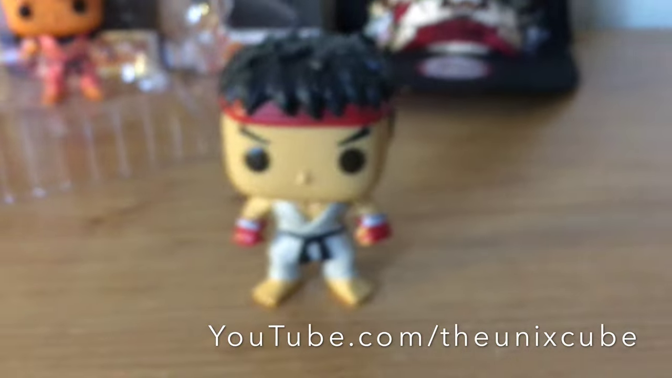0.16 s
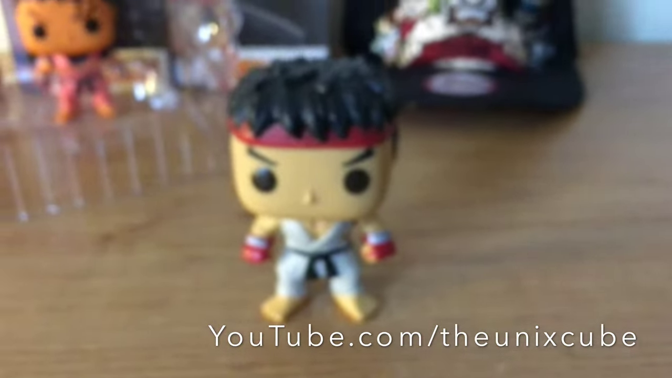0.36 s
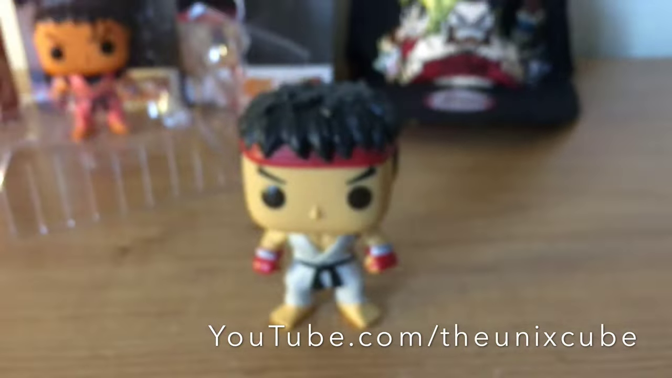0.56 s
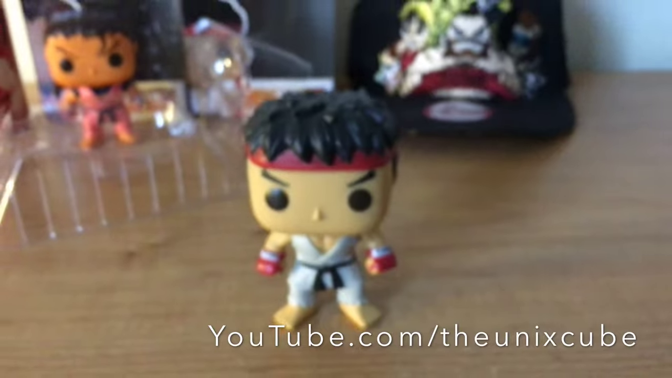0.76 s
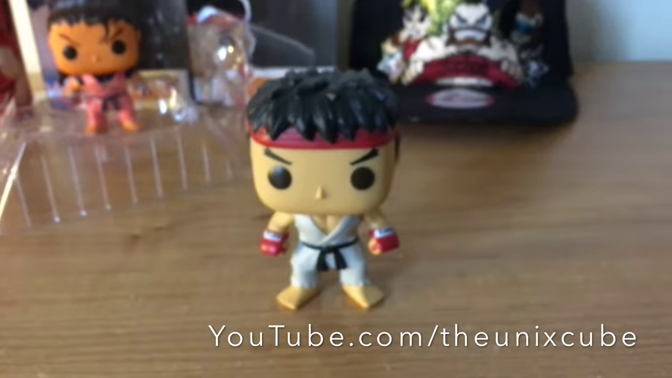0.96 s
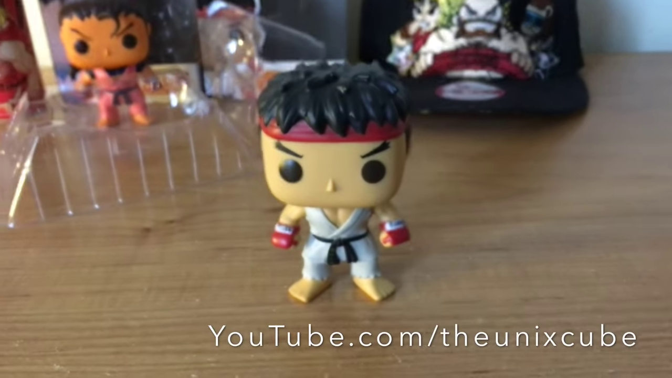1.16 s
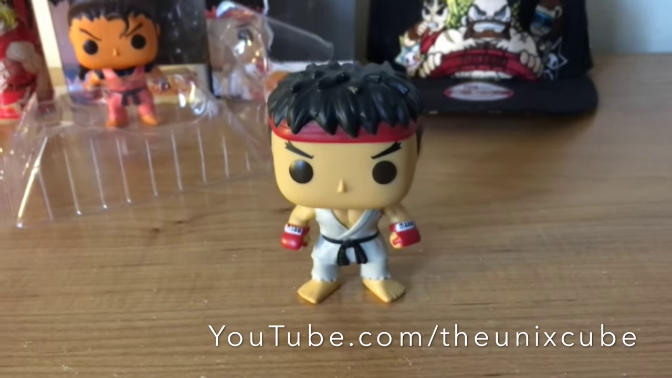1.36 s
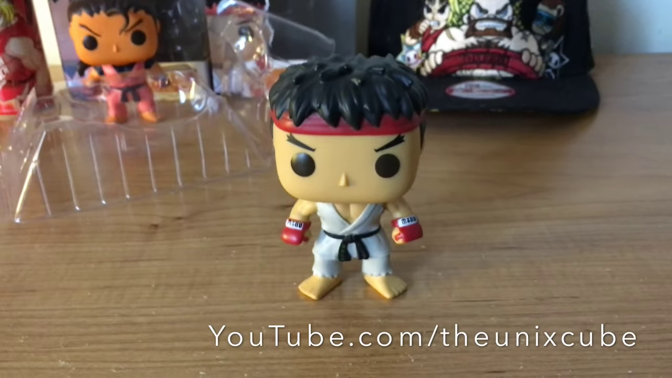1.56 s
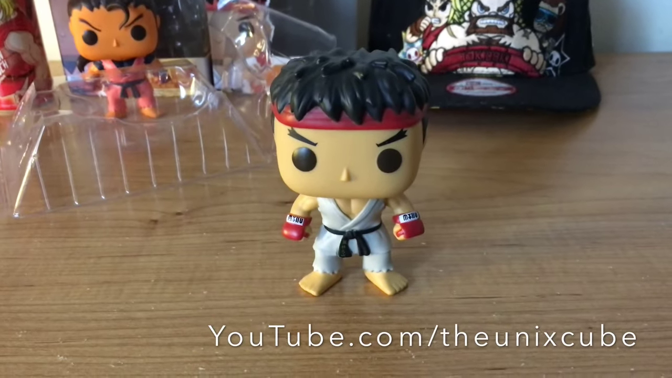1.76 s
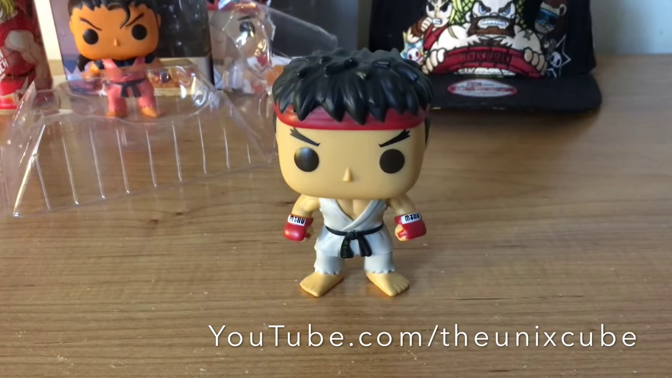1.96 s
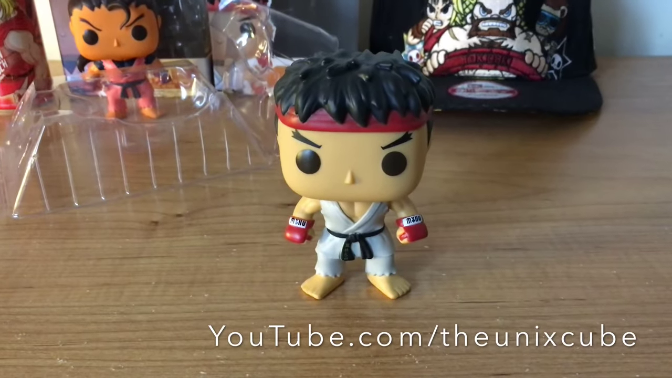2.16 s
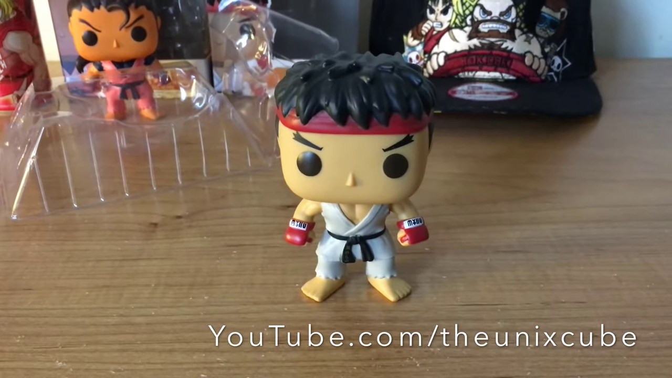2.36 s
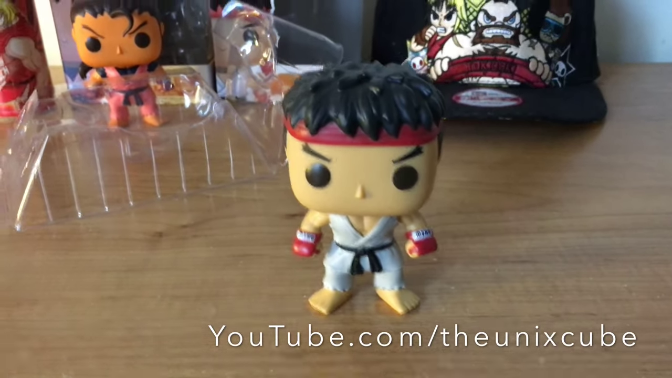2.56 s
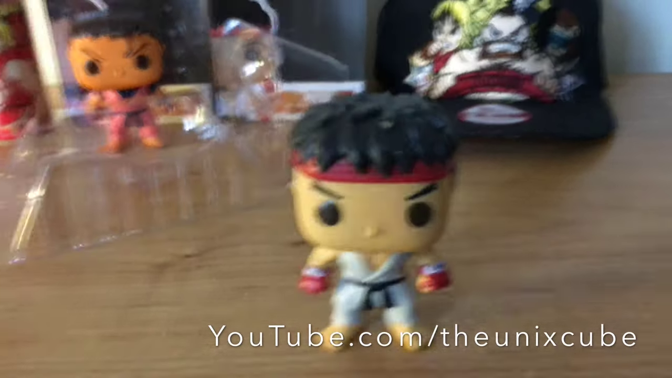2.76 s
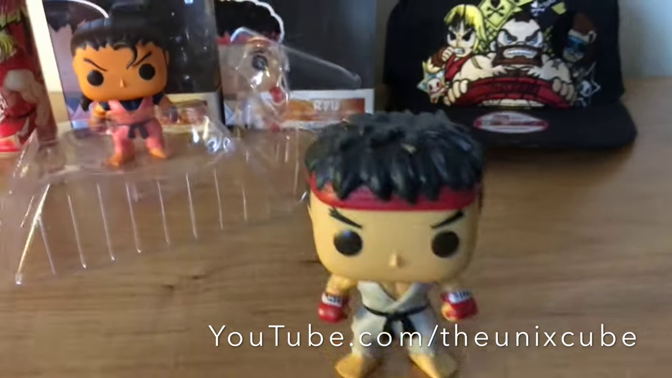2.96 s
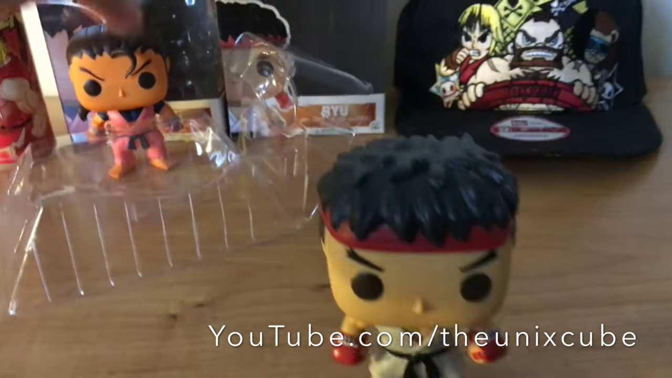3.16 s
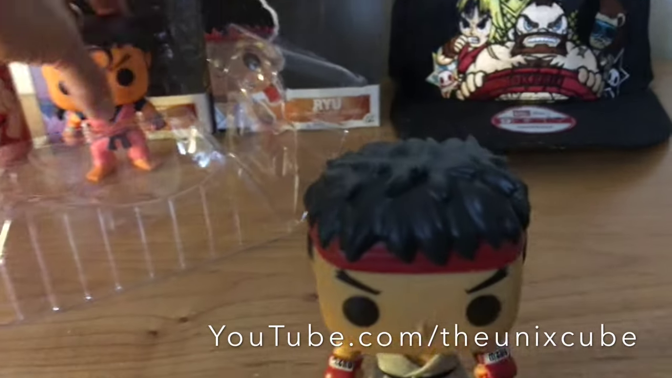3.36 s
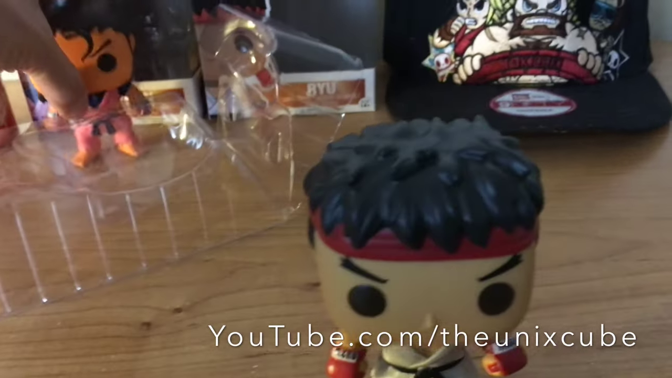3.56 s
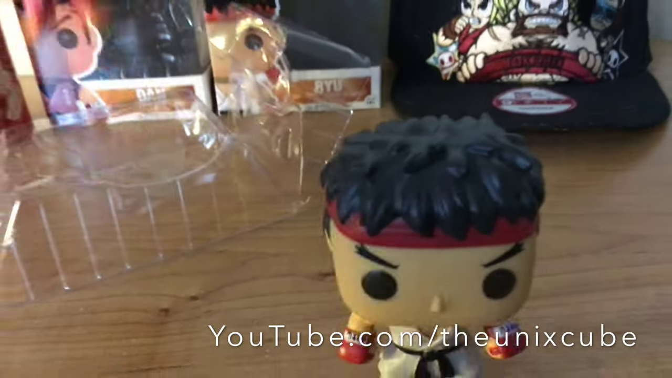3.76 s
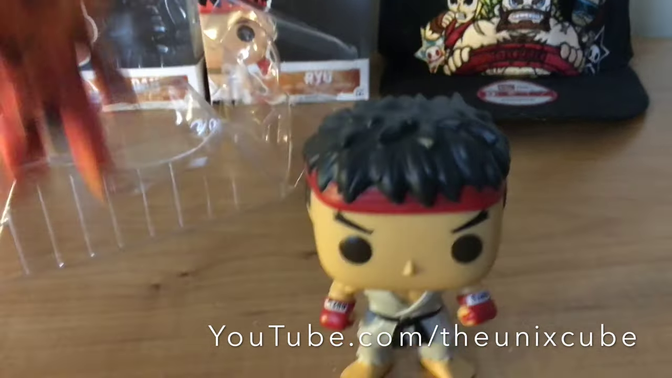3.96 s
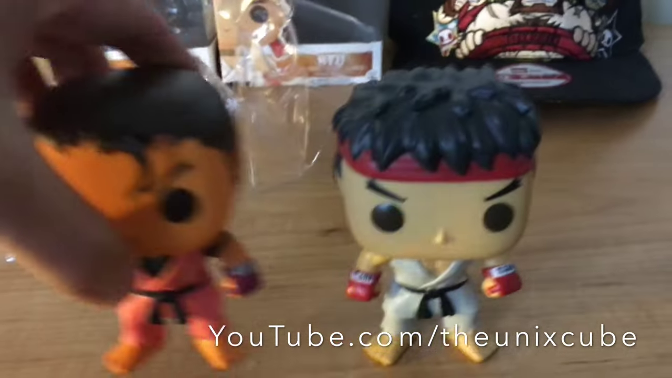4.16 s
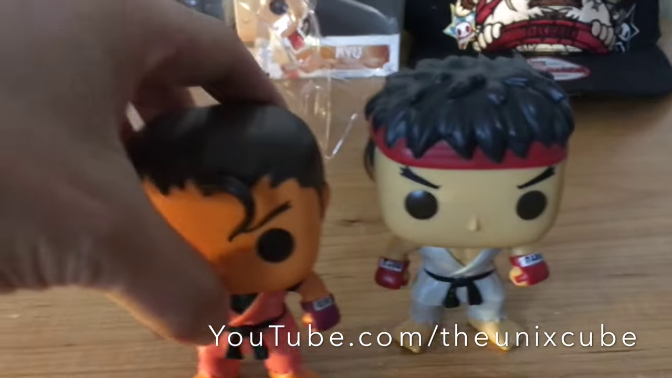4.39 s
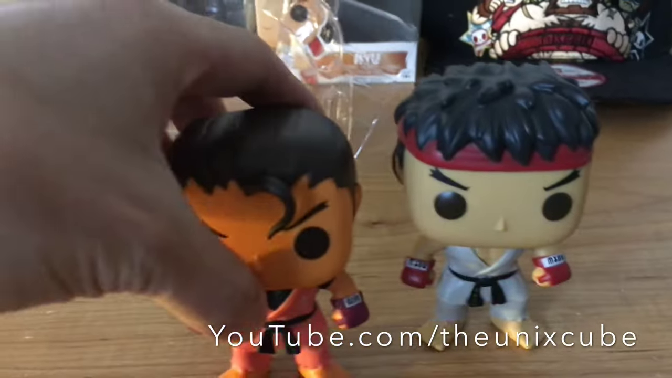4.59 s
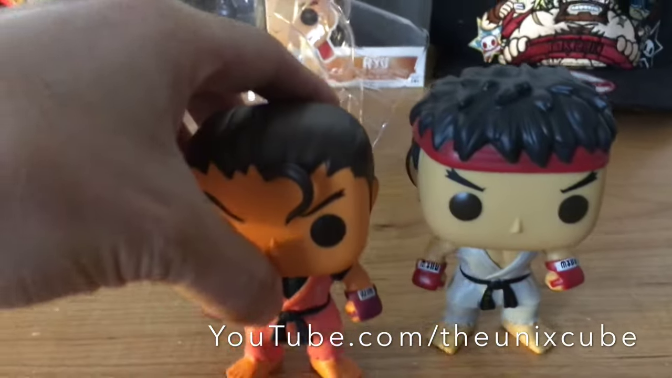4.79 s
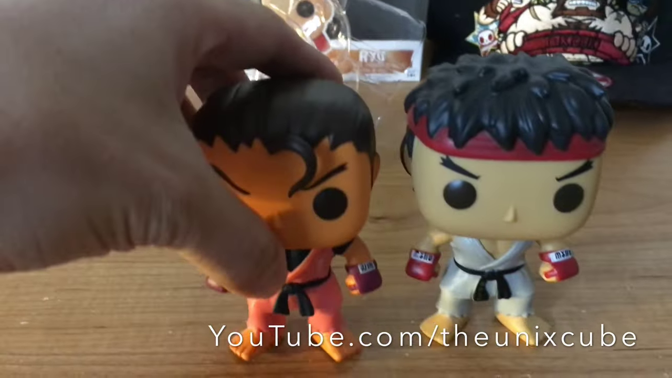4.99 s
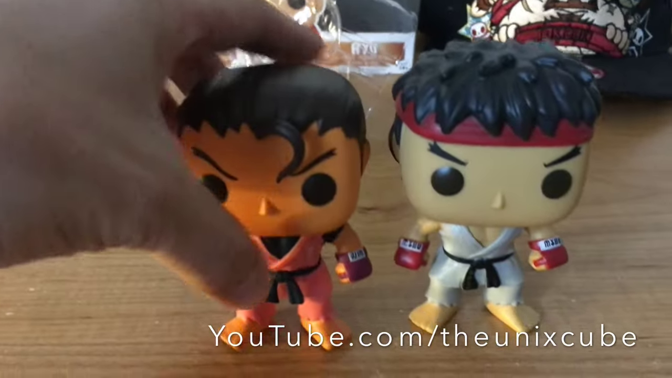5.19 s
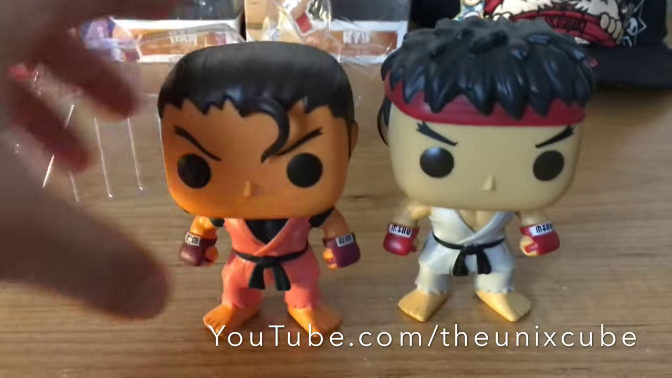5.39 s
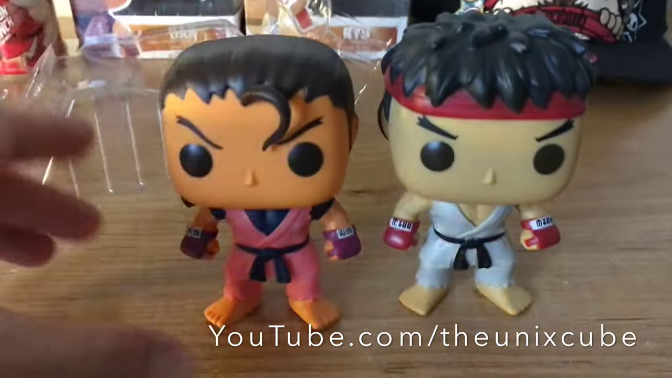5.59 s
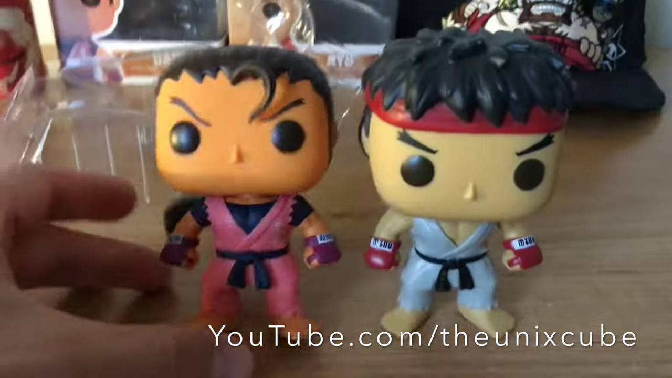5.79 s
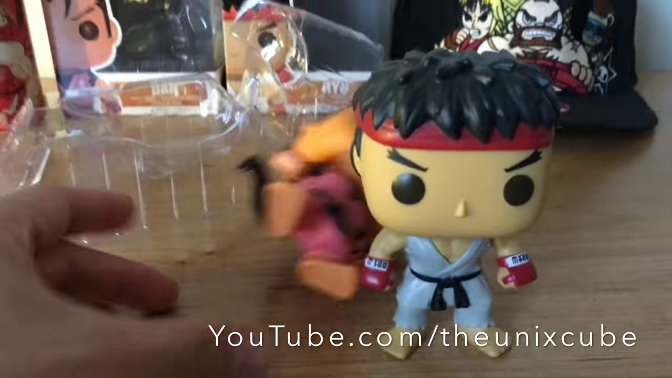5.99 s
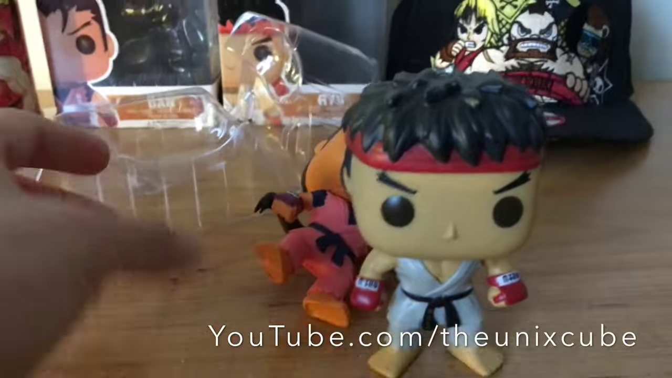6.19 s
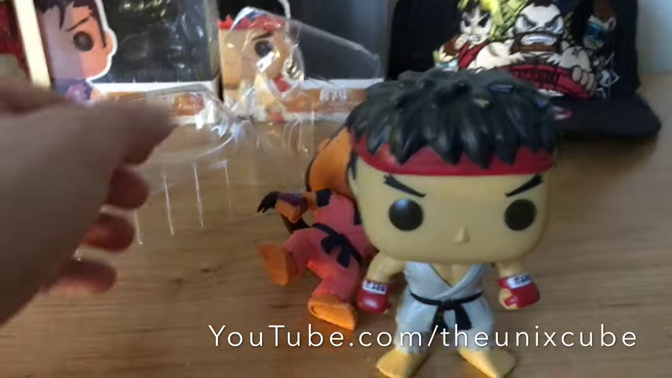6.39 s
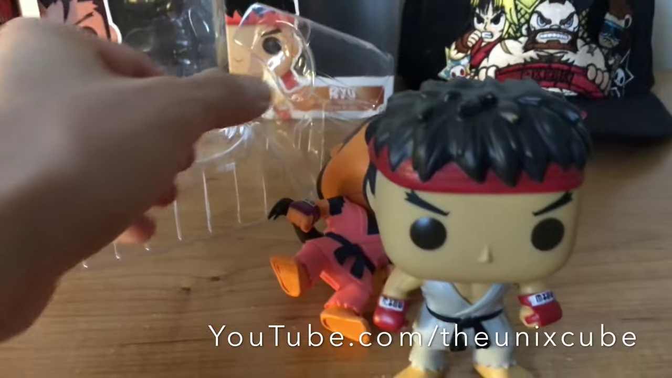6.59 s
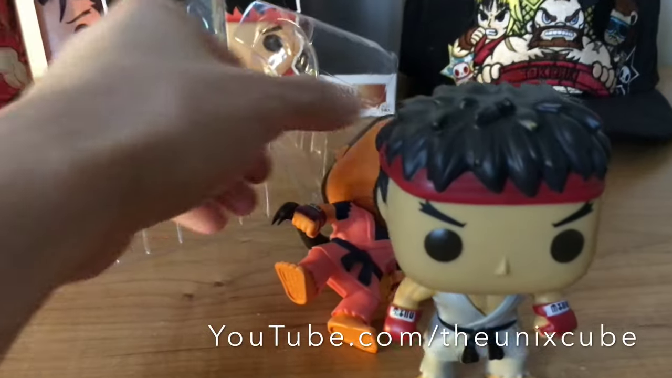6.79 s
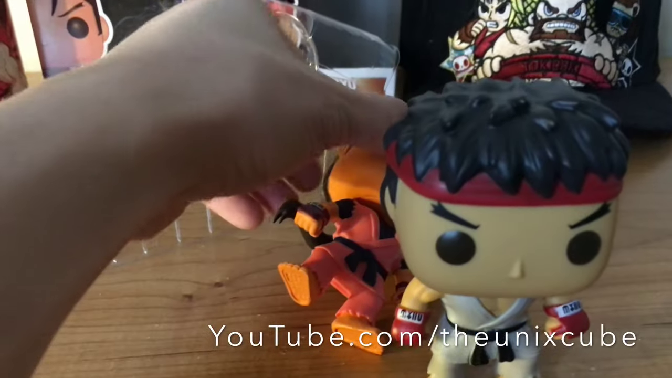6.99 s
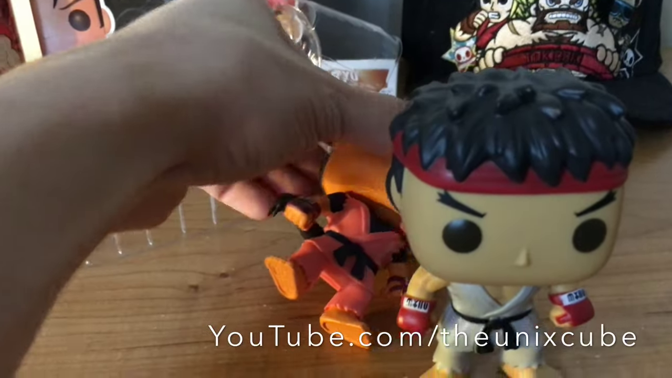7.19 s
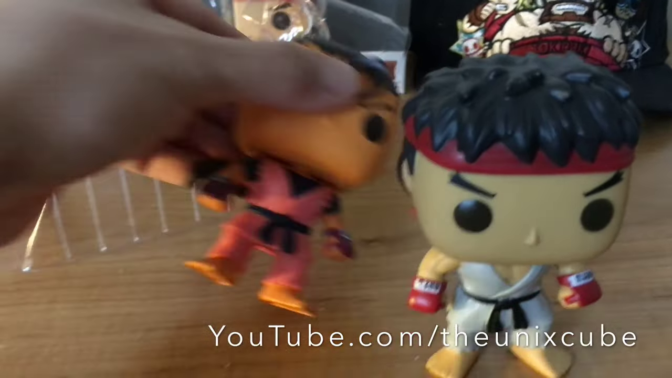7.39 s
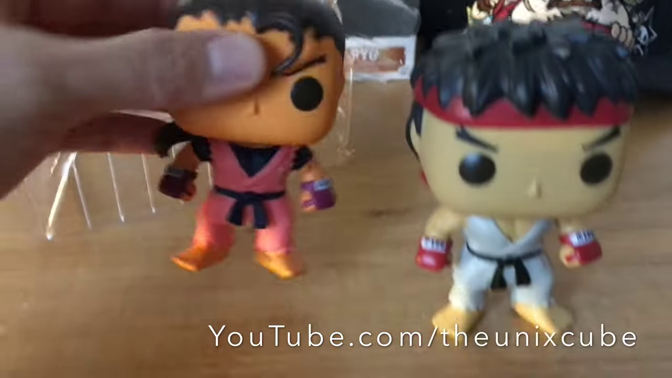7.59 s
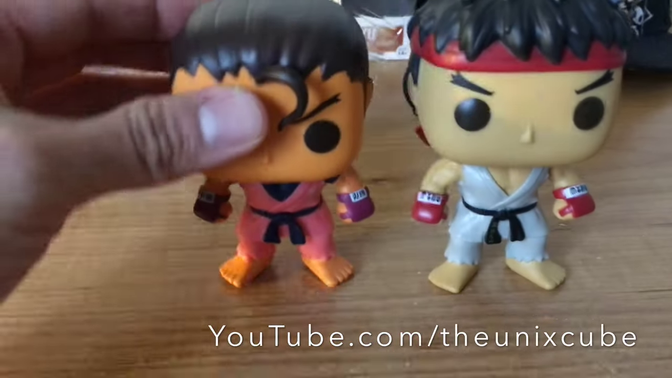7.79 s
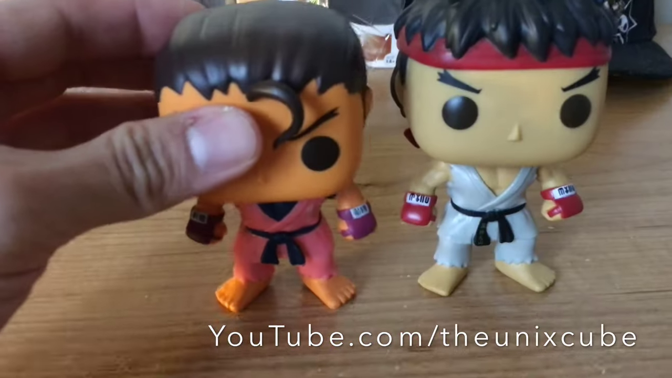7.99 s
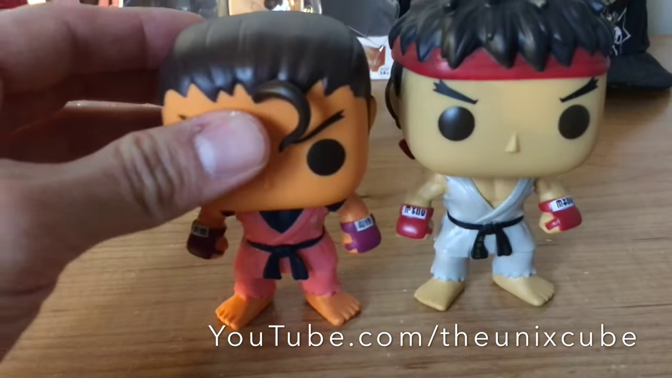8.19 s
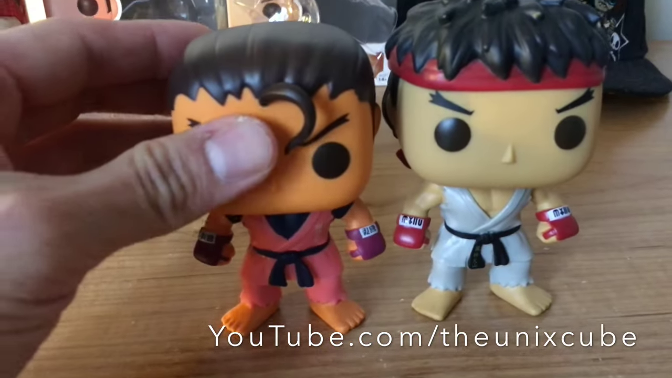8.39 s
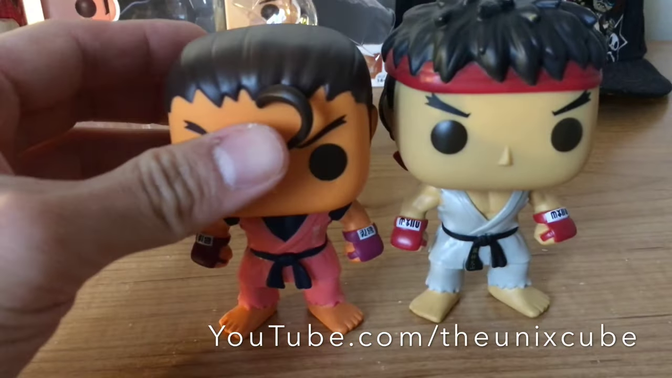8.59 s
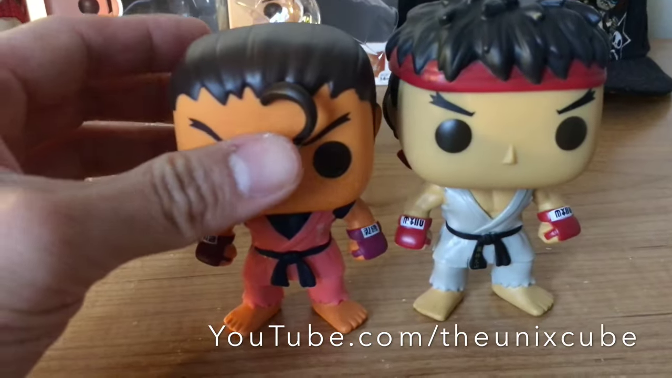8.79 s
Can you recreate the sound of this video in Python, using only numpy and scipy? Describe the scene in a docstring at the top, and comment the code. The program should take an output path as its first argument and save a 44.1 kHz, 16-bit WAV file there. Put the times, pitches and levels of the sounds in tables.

```python
"""Vinyl figure on a wooden desk

A hollow vinyl figure pops out of its thin plastic tray, is stood on a desk and scrapes into place.
It topples and clatters against a second figure, the wood booming under the crack of the shell,
then is picked up and stood again. Early on, the hand bumps the camera: close thumps, a creak
of the grip, finger scuffs. The room is small and quiet."""
import sys
import numpy as np
from scipy import signal
from scipy.fft import rfft, irfft, next_fast_len
from scipy.io import wavfile

SR = 44100
rng = np.random.default_rng(int(sys.argv[2]) if len(sys.argv) > 2 else 0)


def wrap_up_sound(samples):
    """Save the sound to the file named by the first command line argument, as 16-bit audio."""
    columns = np.atleast_2d(samples).T
    # keep every value between -1 and 1, then stretch to whole-number steps
    tamed = np.clip(columns, -1, 1)
    steps = np.round(tamed * 32767).astype(np.int16)
    wavfile.write(sys.argv[1], SR, steps)


N = 390272
TIME = np.arange(N) / SR
RING = np.arange(SR // 3) / SR  # time axis of one hit

# room rumble and microphone hiss: f/Hz, level/dB
ROOM_TONE = [(12, -59.5), (20, -25.5), (41, -8), (65, 1), (113, -9.5), (145, -10), (203, -13.5), (345, -16),
             (510, -23), (637, -21.5), (1250, -26.5), (3700, -31.5), (4890, -34.5), (6290, -33.5),
             (15800, -38.5)]
# decay of the room: f/Hz, t60/s
ROOM_T60 = [(100, 0.82), (300, 0.25), (800, 0.41), (2000, 0.34), (5000, 0.053), (12000, 0.042)]
# colour of the room's tail: f/Hz, level/dB
ROOM_COLOUR = [(60, -8.5), (150, 6), (600, -5), (1200, -0.5), (2500, -5.5), (5000, 0), (14000, -4.5)]
# the held figure lands on its feet: t/s, desk/dB, desk tilt/(dB/octave), shell/dB, legs/dB, tick/dB
TAPS = [(0.016, -27, -11, -28.5, -48, -66), (4.4301, -8.5, -5.5, -12.5, -45, -57),
        (4.629, -32, -5, -41, -60, -62), (7.8365, -10.5, -6, -18.5, -29.5, -33.5)]
# modes of the desk top: f/Hz, level/dB, t60/s
DESK_MODES = [(116.9, -27.5, .2), (153, -16, 0.45), (219.9, -22, 0.62), (254, -13.5, .18),
              (325, -4.5, 0.13), (342, -2.5, 0.1), (401.8, -3.5, .14), (422.4, -8.5, 0.11),
              (538, -16.5, 0.24), (617, -0.5, 0.078), (638, -3.5, .06), (689, -13, 0.051),
              (799, -9.5, 0.059), (841, -12, 0.066), (961, -6, .04)]
# colour of the vinyl shell in the hand: f/Hz, level/dB
HELD_SHELL = [(120, -4.5), (400, -0.5), (600, -2), (800, 8.5), (1000, 4), (1300, -8.5), (1800, -12),
              (2040, -5), (2300, -9.5), (2650, -15.5), (3100, -24), (3700, -26.5), (5000, -35),
              (15000, -47.5)]
# modes of the legs: f/Hz, level/dB, t60/s
LEG_MODES = [(1980, -2.5, 0.13), (1975, -6, 0.066)]
# bright tick of hard plastic: f/Hz, level/dB
TICK = [(1500, -9), (4000, 8), (6000, -1.5), (8000, -6.5), (10000, -11), (12000, -4.5), (16000, -13)]
# the hand bumps the camera: t/s, thump/dB, thump rise/s, case knock/dB, click/dB
BUMPS = [(0.1026, -27.5, .012, -12.5, -16), (2.6132, -37.5, 0.002, -23, -42),
         (2.787, -31.5, .017, -25, -36)]
# modes of the camera case: f/Hz, level/dB, t60/s
CASE_MODES = [(146.5, -7, 0.027), (321, 5, 0.0086), (623, -3, 0.032), (920, 2.5, 0.0096)]
# colour of the grip slipping on the case: f/Hz, level/dB
CREAK = [(500, -29), (1050, 6.5), (1450, -2.5), (1950, 6.5), (3500, -4), (4700, 2), (7500, -5), (9800, 2.5),
         (11000, -3.5), (13000, -1), (16000, -14)]
# a finger scuffs the case: t/s, hold/s, level/dB
SCUFFS = [(0.1187, 0.039, -56), (2.786, 0.02, -41)]
# colour of a scuff: f/Hz, level/dB
SCUFF_COLOUR = [(300, 4.5), (700, -7.5), (900, 6.5), (1030, -2), (1200, 5), (1500, -7.5), (1900, 3),
                (2250, -2), (2750, -5), (3150, -19), (4200, -10), (6500, -18), (9500, -12), (15000, -21)]
# light rustles of plastic and skin: peak t/s, rise/s, fall/s, crinkle/dB, hiss/dB
RUSTLES = [(0.789, .002, 0.026, -63, -72), (.85, 0.027, 0.082, -71, -84), (3.45, 0.081, .07, -77, -71.5),
           (6.722, 0.014, 0.017, -58, -70.5), (7.055, .07, .054, -90, -73.5)]
# midrange of a rustle: f/Hz, level/dB
CRINKLE = [(900, -36), (1500, -5.5), (2000, 2), (3000, -12), (6000, -18), (15000, -54)]
# airy top of a rustle: f/Hz, level/dB
HISS = [(2000, -16), (3500, 10), (7000, 2), (9500, 5.5), (14000, 3), (16000, -1)]
# the palm shifts on the case: peak t/s, rise/s, fall/s, level/dB
PALM_SHIFTS = [(1.42, .04, 0.078, -66), (2.606, 0.011, 0.022, -55.5)]
# colour of skin on the case: f/Hz, level/dB
PALM_COLOUR = [(80, -11), (220, -0.5), (480, -2.5), (750, -23), (1500, -20), (6000, -48)]
# the tray flexes: t/s, pop/dB, crackle/dB
TRAY_POPS = [(3.3885, -19.5, -40), (3.4128, -30, -58), (3.4235, -34, -69), (3.455, -23.5, -43)]
# modes of the thin tray: f/Hz, level/dB, t60/s
TRAY_MODES = [(275, -3, 0.14), (298, 1, 0.094), (412, 5.5, 0.08), (660, 4, 0.03), (714, 9.5, 0.04),
              (938, 1.5, 0.075), (1270, 14, 0.011), (1504, 1.5, 0.03), (1880, 4, 0.027), (2260, 7.5, 0.011),
              (3560, -9, 0.01), (6960, -8, 0.0129)]
# the figure scrapes over the desk: peak t/s, rise/s, fall/s, desk/dB, shell/dB, legs/dB
SLIDES = [(3.542, 0.014, .014, -53.5, -60.5, -80), (4.915, 0.08, 0.094, -54.5, -61.5, -75),
          (5.894, .032, .024, -45.5, -52.5, -70), (7.238, 0.057, 0.036, -61, -59, -82.5),
          (7.33, 0.006, 0.01, -66, -65, -90), (7.996, 0.04, .019, -64, -63, -65),
          (8.075, 0.039, 0.038, -67.5, -62.5, -76)]
# the loose figure tumbles: t/s, desk/dB, desk tilt/(dB/octave), shell/dB, shell tilt/(dB/octave),
# first flight/s, rebounds (rounded to a count)
KNOCKS = [(5.942, -12, 2.5, -22.5, -9.5, 0, 0), (5.9574, 10, 4, 6.5, -8, 0, 0),
          (5.995, 13, 3.5, 3.5, -4.5, .0438, 3.5), (6.1256, -4.5, -7, -10.5, 5, 0, -0.5),
          (6.146, 0, 2, -21, -3, 0, 0.5), (6.1896, 6.5, 8.5, 0, -4.5, .0469, 1),
          (6.213, 0.5, 1, -7.5, -11, 0, -0.5)]
# crowded, well damped modes of the loose shell: f/Hz, level/dB
LOOSE_SHELL = [(300, -24.5), (700, -5), (970, 2.5), (1180, -6), (1600, 1), (1870, -10.5), (2430, 5),
               (2700, -6), (3250, 0.5), (3500, -9), (3850, -2.5), (4600, -15.5), (6200, -14), (8000, -32.5),
               (16000, -55.5)]
# the few shell modes that ring on: f/Hz, level/dB, t60/s
SHELL_MODES = [(1612, -4, 0.081), (1676, -3, .1), (2368, 2, .07), (2535, -0.5, .09), (3180, -3.5, .08),
               (3375, -5, 0.06), (3890, -2, .06)]
# fingertips catch on the head: peak t/s, half length/s, level/dB
RUBS = [(6.712, .005, -45.5), (6.736, 0.016, -43.5), (6.789, 0.0037, -56), (6.834, 0.0058, -59)]
# modes of the gripped head: f/Hz, level/dB, t60/s
HEAD_MODES = [(697, 2.5, 0.05), (786.54, -5, 0.034), (1007, 9, 0.03), (1086, -0.5, 0.031),
              (1610, -1, 0.034), (1850, 0, 0.018), (3500, -3, .006)]

HAND_DAMPING_DB_PER_S = 122  # pressing the figure down chokes the desk's ring


def amp(db):
    return 10 ** (np.asarray(db) / 20)


def unit_rms(x):
    return x / np.sqrt(np.mean(x ** 2) + 1e-20)


def struck(x):
    """Scale a hit so that its first 7 ms hold unit energy."""
    return x / np.linalg.norm(x[:SR // 140])


def along(points, hz):
    """Read a curve of (f/Hz, value) points on a log frequency axis."""
    f, value = np.transpose(points)
    return np.interp(np.log(hz + 1), np.log(f), value)


def add(track, s, x):
    """Mix x into the track from time s."""
    start = max(round(s * SR), 0)
    track[start:start + len(x)] += x[:N - start]


def filtered(x, response):
    """Equalise x with a gain curve over frequency."""
    size = next_fast_len(len(x) + SR // 5)
    hz = np.fft.rfftfreq(size, 1 / SR)
    return irfft(rfft(x, size) * response(hz), size)[:len(x)]


def noise(spectrum, size):
    """Coloured noise of rms 1."""
    return unit_rms(filtered(rng.standard_normal(size), lambda hz: amp(along(spectrum, hz))))


def ring(modes, tilt_db=0, travel=0, attack=.0001):
    """Damped modes, weighted anew by each point of contact; a soft contact tilts them to the bass."""
    hz, db, t60 = np.transpose(modes)[:, :, None]
    level = db + rng.standard_normal(hz.shape) + tilt_db * np.log2(hz / hz[0])
    t = np.maximum(RING - travel * np.sqrt(hz[0] / hz), 0)  # low bending waves travel slowest
    waves = amp(level - 60 * t / t60) * np.sin(2 * np.pi * hz * t)
    onset = 1 - np.exp(-t / attack)
    return struck(np.sum(waves * onset, axis=0))


def burst(spectrum, t60, tilt_db=0):
    """Modes so many and so damped that they make a short crack of coloured noise."""
    tilted = [(hz, db + tilt_db * np.log2(hz)) for hz, db in spectrum]
    return struck(noise(tilted, len(RING)) * amp(-60 * RING / t60))


def swell(s, rise, fall):
    """The pressure of one stroke, peaking at s."""
    width = np.where(TIME < s, rise, fall)
    return np.exp(-np.minimum(((TIME - s) / width) ** 2, 50))


def friction(body, grain_db):
    """Countless tiny slips of uneven size drive a body's ring."""
    slips = rng.standard_normal(N)
    grain = np.repeat(rng.standard_normal(N // 64 + 1), 64)[:N]
    return unit_rms(signal.fftconvolve(slips * amp(grain_db * grain), body)[:N])


def in_room(x, wet_db):
    """The direct sound and a diffuse tail whose treble dies first."""
    hz, t, spectra = signal.stft(rng.standard_normal(SR * 2 // 3), SR, nperseg=256)
    fade_db = along(ROOM_COLOUR, hz)[:, None] - 60 * t / along(ROOM_T60, hz)[:, None]
    tail = signal.istft(spectra * amp(fade_db), SR, nperseg=256)[1]
    tail *= 1 - np.exp(-(np.arange(len(tail)) / SR / 0.002) ** 2)  # the walls answer a moment later
    response = amp(wet_db) * tail / np.linalg.norm(tail)
    response[0] += 1
    return signal.fftconvolve(x, response)


def room_tone():
    """A steady bed of low room rumble and microphone hiss."""
    return amp(-66.5) * noise(ROOM_TONE, N)


def desk_ring(tilt_db):
    """The desk top booms, but radiates little deep bass."""
    low_cut = signal.butter(4, 110, "high", fs=SR, output="sos")
    boom = ring(DESK_MODES, tilt_db, travel=0.0015, attack=0.0004)
    return struck(signal.sosfilt(low_cut, boom))


def foot_taps():
    """The feet land softly; the hand damps desk and shell, and the legs ring on."""
    out = np.zeros(N)
    soften = signal.butter(2, 3200, fs=SR, output="sos")
    for s, desk_db, desk_tilt_db, shell_db, legs_db, tick_db in TAPS:
        desk = amp(desk_db) * desk_ring(desk_tilt_db) * amp(-HAND_DAMPING_DB_PER_S * RING)
        shell = amp(shell_db) * burst(HELD_SHELL, t60=0.049, tilt_db=1.0)
        legs = amp(legs_db) * ring(LEG_MODES)
        tick = amp(tick_db) * burst(TICK, t60=0.0096, tilt_db=4.5)
        add(out, s, in_room(signal.sosfilt(soften, desk + shell) + legs + tick, wet_db=-16.5))
    return out


def thump(rise):
    """A soft push on the camera swells and dies, its pitch sinking as it fades."""
    from_hz, to_hz, sag_s = 163, 42, 0.013
    hz = to_hz + (from_hz - to_hz) * np.exp(-RING / sag_s)
    envelope = (RING / rise * np.exp(1 - RING / rise)) ** 2.3
    return envelope * np.sin(2 * np.pi * np.cumsum(hz) / SR)


def camera_bumps():
    """The hand hits the camera: a low thump, a knock of the case and a click on top."""
    out = np.zeros(N)
    for s, thump_db, rise, case_db, click_db in BUMPS:
        knock = amp(case_db) * ring(CASE_MODES, travel=0.0012, attack=0.0008)
        click = amp(click_db) * burst(CREAK, t60=0.021, tilt_db=-7.5)
        add(out, s, amp(thump_db) * thump(rise) + knock + click)
    return out


def slip_click(spectrum):
    """One clean slip: the minimum-phase pulse with this spectrum."""
    size = len(RING)
    gain = amp(along(spectrum, np.fft.rfftfreq(size, 1 / SR)))
    cepstrum = irfft(np.log(gain), size)
    cepstrum[1:size // 2] *= 2
    cepstrum[size // 2 + 1:] = 0
    return struck(irfft(np.exp(rfft(cepstrum)), size))


def grip_creak():
    """The grip lets go of the case in a run of slips, ever quicker and weaker."""
    s, first_gap_s, gap_ratio = .1144, .008, .87
    first_db, fade_db = -6, 8.5
    out = np.zeros(N)
    for k in range(8):
        slip = slip_click(CREAK) + amp(-10) * burst(CREAK, t60=0.0083)
        add(out, s, amp(first_db - fade_db * np.log2(k + 1)) * slip)
        s += first_gap_s * gap_ratio ** k
    return out


def finger_scuffs():
    """A fingertip catches on the case with a snap, drags briefly and snaps free."""
    attack_s, release_s, snap_over_drag_db = 0.0022, 0.0048, 20.5
    drag = noise(SCUFF_COLOUR, N)
    out = np.zeros(N)
    for s, hold, db in SCUFFS:
        attack = np.clip((TIME - s) / attack_s, 0, 1)
        release = np.exp(-np.clip((TIME - s - hold) / release_s, 0, 50))
        out += amp(db) * attack * release * drag
        for edge in (s, s + hold):
            add(out, edge, amp(db + snap_over_drag_db) * burst(SCUFF_COLOUR, t60=0.014, tilt_db=1.5))
    return out


def rustles():
    """Plastic and skin brush in light swells of crinkle and hiss."""
    crinkle, hiss = noise(CRINKLE, N), noise(HISS, N)
    strokes = sum(swell(s, rise, fall) * (amp(crinkle_db) * crinkle + amp(hiss_db) * hiss)
                  for s, rise, fall, crinkle_db, hiss_db in RUSTLES)
    return in_room(strokes, wet_db=-17)[:N]


def palm_shifts():
    """The palm moves on the case with a soft, dark brush."""
    pressure = sum(amp(db) * swell(s, rise, fall) for s, rise, fall, db in PALM_SHIFTS)
    return pressure * noise(PALM_COLOUR, N)


def tray_pops():
    """The thin tray pops and crackles as the figure leaves it, farther back on the desk."""
    out = np.zeros(N)
    for s, pop_db, crackle_db in TRAY_POPS:
        pop = amp(pop_db) * ring(TRAY_MODES, travel=0.00228)
        crackle = amp(crackle_db) * burst(TICK, t60=0.022)
        add(out, s, in_room(pop + crackle, wet_db=-10))
    return out


def slides():
    """The feet stick and slip on the wood: desk and hand-damped shell rasp, and the legs sing."""
    desk = friction(desk_ring(tilt_db=-3) * amp(-HAND_DAMPING_DB_PER_S * RING), grain_db=3)
    shell = friction(burst(HELD_SHELL, t60=.006), grain_db=3.5)
    shell += amp(-19) * friction(burst(TICK, t60=0.0032), grain_db=4.5)  # fine grit on top
    legs = friction(ring(LEG_MODES), grain_db=4.5)
    out = np.zeros(N)
    for s, rise, fall, desk_db, shell_db, legs_db in SLIDES:
        out += swell(s, rise, fall) * (amp(desk_db) * desk + amp(shell_db) * shell + amp(legs_db) * legs)
    return in_room(out, wet_db=-12.5)[:N]


def blow(desk_db, desk_tilt_db, shell_db, shell_tilt_db):
    """One hit booms in the desk, cracks and rings in the shell; a harder spot ticks more."""
    desk = amp(desk_db) * desk_ring(desk_tilt_db)
    crack = burst(LOOSE_SHELL, t60=.02, tilt_db=shell_tilt_db)
    buzz = amp(-18.5) * burst(LOOSE_SHELL, t60=0.11, tilt_db=shell_tilt_db)
    modes = amp(-10.5) * ring(SHELL_MODES, tilt_db=shell_tilt_db + 1)
    tick_db = (desk_db + shell_db) / 2 - 25 + 0.5 * shell_tilt_db
    tick = amp(tick_db) * burst(TICK, t60=0.017)
    return desk + amp(shell_db) * (crack + buzz + modes) + tick


def tumble():
    """The figure hits and rebounds, each flight shorter and each landing softer and duller."""
    restitution, desk_loss_db, shell_loss_db, dulling_db_per_octave = .62, 4.5, 7.5, 0.5  # per rebound
    out = np.zeros(N)
    for s, desk_db, desk_tilt_db, shell_db, shell_tilt_db, flight, rebounds in KNOCKS:
        for k in range(round(rebounds) + 1):
            hit = blow(desk_db - k * desk_loss_db, desk_tilt_db - k * dulling_db_per_octave,
                       shell_db - k * shell_loss_db, shell_tilt_db)
            add(out, s, in_room(hit, wet_db=-15.5))
            s += flight * restitution ** k
    return out


def skitter():
    """The rolling figure chatters finely on the wood, and its limbs graze it after each knock."""
    chatter = friction(burst(LOOSE_SHELL, t60=.008, tilt_db=5.5), grain_db=4.5)
    out = amp(-56) * swell(6.06, rise=.06, fall=0.2) * chatter
    for s, _, _, shell_db, *_ in KNOCKS:
        for delay_s in rng.uniform(.012, .036, size=2):
            graze = burst(LOOSE_SHELL, t60=0.027, tilt_db=1.5)
            tick = amp(-11) * burst(TICK, t60=0.0088)
            add(out, s + delay_s, amp(shell_db - 23) * (graze + tick))
    return in_room(out, wet_db=-9)[:N]


def head_rubs():
    """Fingertips catch on the hollow head and set it ringing."""
    pressure = sum(amp(db) * swell(s, half, half) for s, half, db in RUBS)
    rub = friction(ring(HEAD_MODES), grain_db=6.5)
    return in_room(pressure * rub, wet_db=-17)[:N]


def scene():
    """Mono mix: the figure plays in the room; camera handling comes dry through the case."""
    figure = tumble() + skitter() + foot_taps() + slides() + head_rubs() + rustles() + tray_pops()
    camera = grip_creak() + finger_scuffs() + camera_bumps() + palm_shifts()
    return (figure + camera + room_tone())[None]


def record(dry):
    """A steep high cut at the camera's band limit."""
    top_hz = 15900
    return filtered(dry[0], lambda hz: 1 / np.sqrt(1 + (hz / top_hz) ** 160))[None]


dry = scene()
out = record(dry)
wrap_up_sound(out)
```